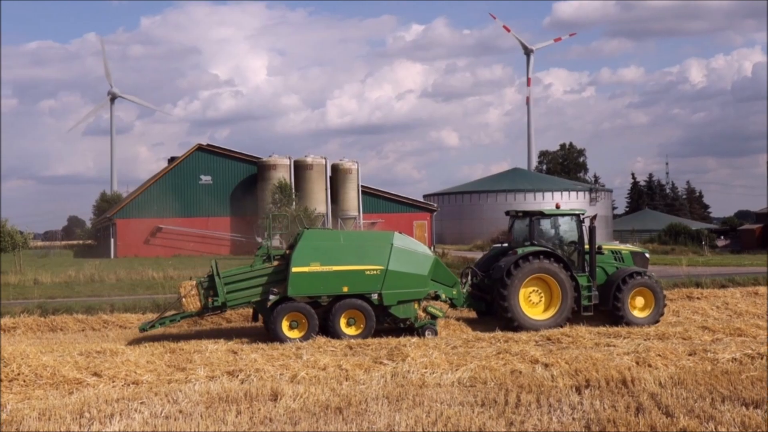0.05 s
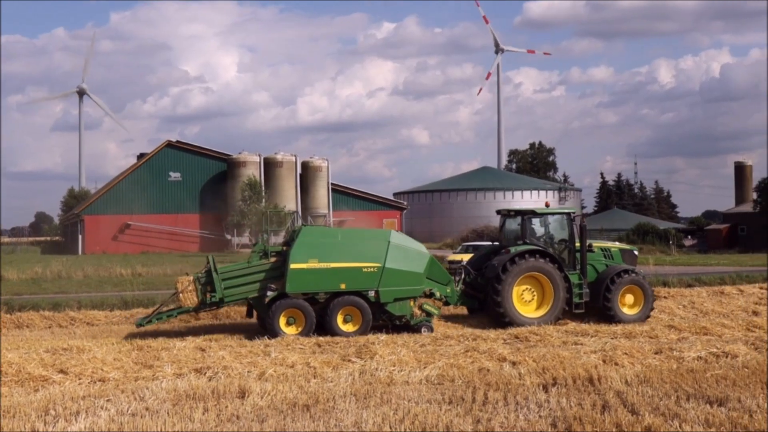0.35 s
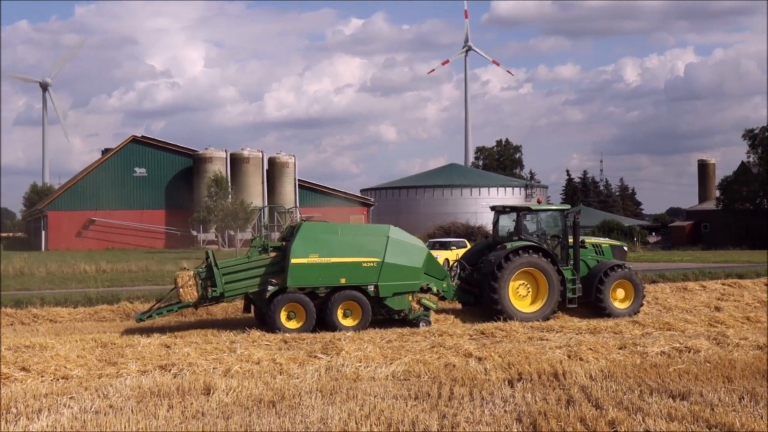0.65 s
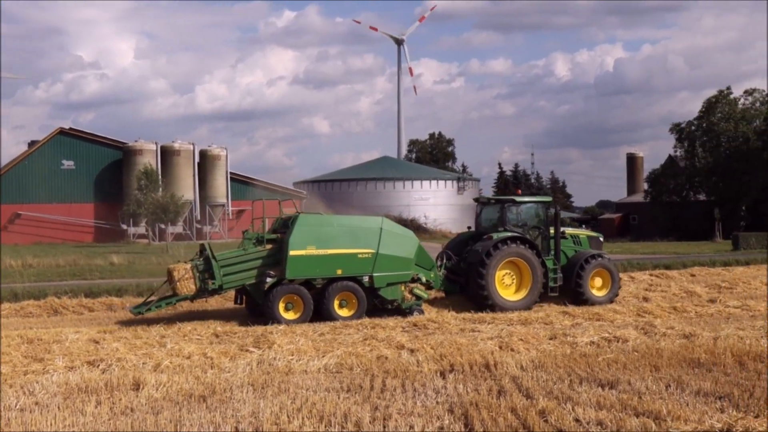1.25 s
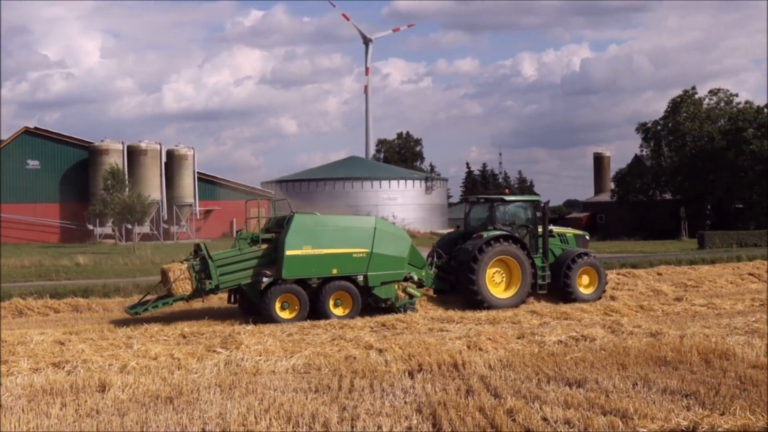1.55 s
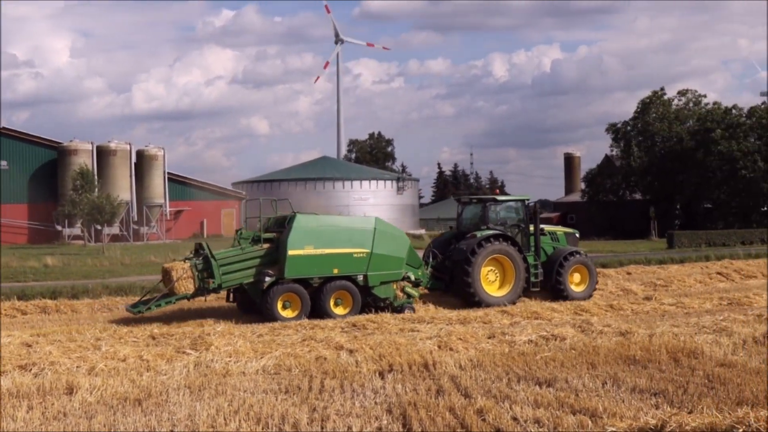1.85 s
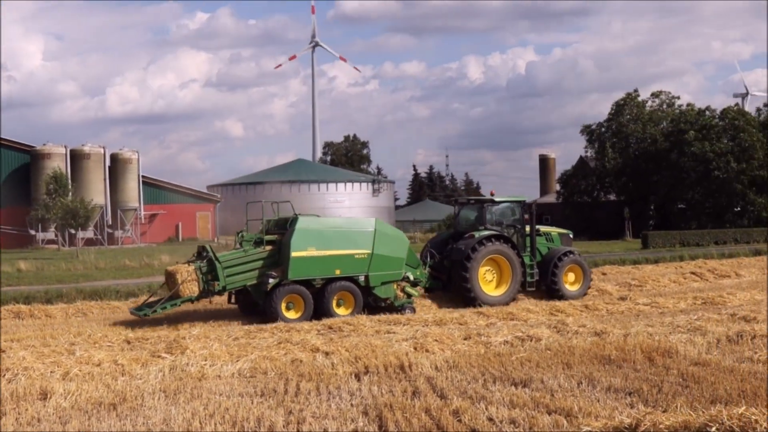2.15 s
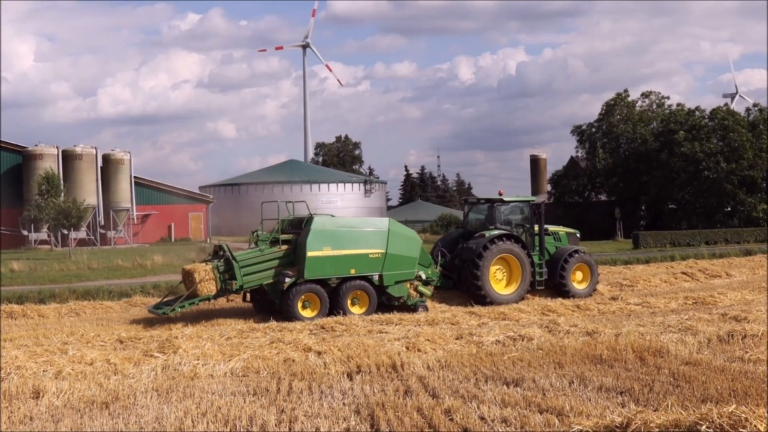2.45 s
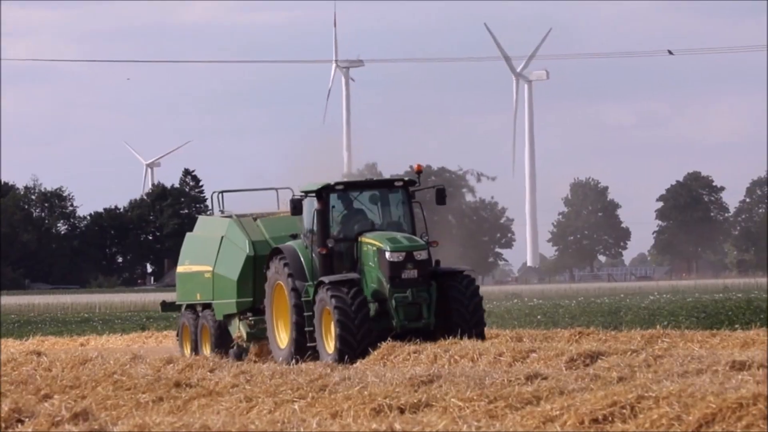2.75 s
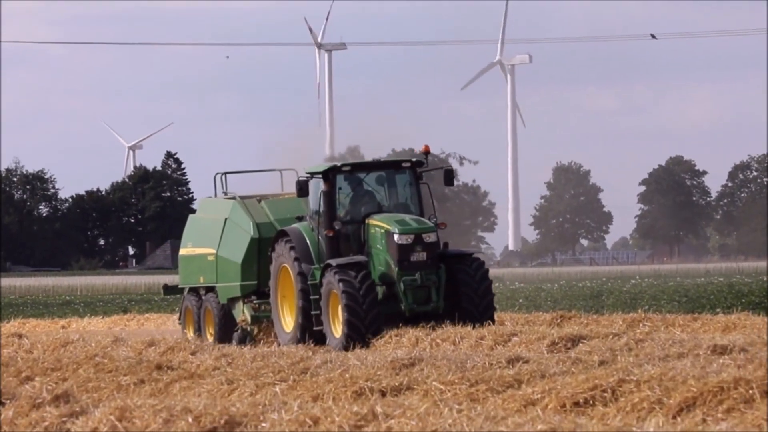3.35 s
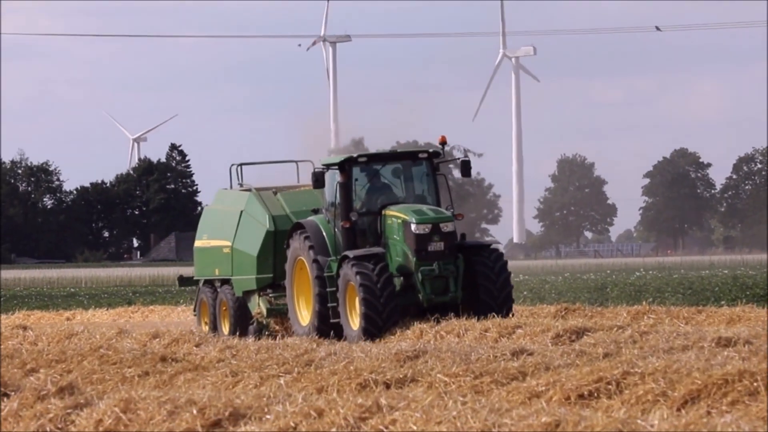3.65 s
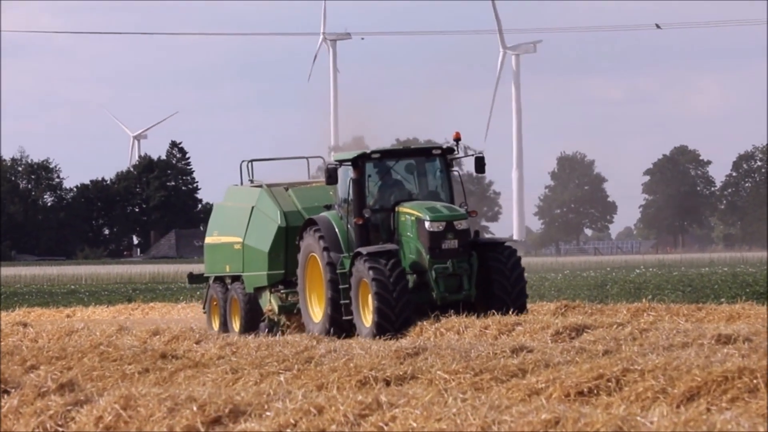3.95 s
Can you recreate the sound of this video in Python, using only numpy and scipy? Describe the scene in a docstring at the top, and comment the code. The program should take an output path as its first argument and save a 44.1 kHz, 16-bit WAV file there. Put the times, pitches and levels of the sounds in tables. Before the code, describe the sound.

A diesel tractor and baler run loudly from the start, with a fan hum and rushing, rattling straw. Irregular crunches, dull knocks and metal ticks come throughout, with short squeaks around 1.4 seconds and a clank near 1.9. At 2.4 seconds everything cuts to silence. From 2.7 to 4 seconds the tractor returns quieter and farther off, with a low throb, light clatter, faint whine and wind on the microphone.

```python
"""A diesel drone, a fan hum and rushing straw, with crunches, knocks, clanks, squeaks and sharp ticks:
a tractor pulls a big square baler across a stubble field, heard side-on. Straw rattles through the
pickup, the plunger crushes each charge, loose guards chatter and wind buffets the microphone.
After a short silence the rig is heard from the front, farther off: soft exhaust throb, injector
clatter and a gear whine."""
import sys
import numpy as np
from scipy import signal
from scipy.fft import rfft, irfft
from scipy.io import wavfile

SR = 44100
rng = np.random.default_rng(int(sys.argv[2]) if len(sys.argv) > 2 else 0)


def unload_audio(sound):
    """Save the sound as a 16-bit wav file, at the path given as the first command line argument."""
    columns = np.transpose(np.atleast_2d(sound))
    # keep every value between -1 and 1, then stretch to whole-number steps
    steps = np.round(np.clip(columns, -1, 1) * 32767)
    wavfile.write(sys.argv[1], SR, steps.astype(np.int16))


N = 176400
T = np.arange(N) / SR
FIRINGS_PER_TURN = 3  # six cylinders


def from_db(db):
    return 10 ** (np.asarray(db) / 20)


def unit_rms(x):
    return x / np.sqrt(np.mean(x ** 2) + 1e-20)


def in_time(rows):
    """Table columns, interpolated linearly in time."""
    times, *columns = np.transpose(rows)
    return np.squeeze([np.interp(T, times, column) for column in columns])


def drift(rate_hz):
    """Slow random wander, rms about 1."""
    pole = np.exp(-80 * np.pi * rate_hz / SR)
    slow = signal.lfilter([1], [1, -2 * pole, pole * pole], rng.standard_normal(N // 40 + 2002))[2000:]
    return np.interp(np.arange(N) / 40, np.arange(len(slow)), unit_rms(slow))


def coloured(x, spectrum):
    """Filter by (frequency [Hz], gain [dB]) rows, steep skirts beyond the ends; rms 1."""
    hz, db = np.transpose(spectrum)
    bins_hz = np.maximum(np.arange(N // 2 + 1) * SR / N, 1)
    gain = from_db(np.interp(np.log(bins_hz), np.log(hz), db))
    skirts = np.minimum(1, np.minimum(bins_hz / hz[0], hz[-1] / bins_hz)) ** 4
    return unit_rms(irfft(rfft(x) * gain * skirts, N))


def noise(width_db):
    """Stereo white noise; width is side over mid."""
    mid, side = rng.standard_normal((2, N))
    return mid + from_db(width_db) * side * np.array([[1], [-1]])


def grains(per_s, spread_db):
    """Randomly timed snaps; rms 1."""
    sizes = from_db(spread_db * np.minimum(rng.exponential(1, N), 4)) * rng.choice([-1, 1], N)
    return unit_rms(sizes * (rng.random(N) < per_s / SR))


def phase_of(hz):
    return 2 * np.pi * np.cumsum(hz) / SR


def burst(start_s, hold_s, attack_s, decay_s):
    """Linear attack, hold, exponential release."""
    attack = np.clip((T - start_s) / attack_s, 0, 1)
    return attack * np.exp(-np.maximum(T - start_s - hold_s, 0) / decay_s)


def rattle(per_s, low_hz, high_hz, ring_s, count):
    """Small parts struck at random, each ringing briefly at its own pitch."""
    rings, pole = 0, np.exp(-1 / (ring_s * SR))
    for hz in np.linspace(low_hz, high_hz, count) * rng.uniform(.98, 1.02, count):
        omega = 2 * np.pi * hz / SR
        chance = rng.random(N) * SR / per_s
        taps = np.where(chance < 1, chance - .5, 1e-18)
        rings += signal.lfilter([np.sin(omega)], [1, -2 * pole * np.cos(omega), pole * pole], taps)
    return unit_rms(rings)


def diesel(firing_phase):
    """Low exhaust orders, each slightly unsteady in level and phase."""
    # exhaust orders: (multiple of firing rate, relative level [dB])
    orders = [(1, -2.5), (1.5, -10.5), (2, -16.5)]
    # drone: (time [s], level [dB])
    level = [(0, -25), (.3, -25.5), (.45, -30), (.8, -27.5), (1.3, -34), (1.65, -27), (2, -32), (2.42, -32),
             (2.66, -43), (3.15, -43), (3.27, -37), (3.5, -37), (3.66, -50), (3.76, -35), (3.86, -41),
             (4, -42)]
    exhaust = 0
    for order, db in orders:
        gain = from_db(db + 1.8 * drift(2.6))
        exhaust += gain * np.sin(order * firing_phase + .2 * drift(5.1) + rng.uniform(0, 2 * np.pi))
    return from_db(in_time(level)) * unit_rms(exhaust)


def housing_rumble():
    """The running baler's housing rumbles, side-on."""
    # housing spectrum: (frequency [Hz], gain [dB])
    colour = [(55, -8.5), (80, -6.5), (130, -1.5), (175, -4), (250, -3), (330, -5.5), (420, -10.5),
              (500, -16), (700, -17.5), (910, -23)]
    # rumble: (time [s], relative level [dB])
    level = [(0, -22.5), (.6, -24), (.9, -23), (1.3, -25), (1.7, -23.5), (2.1, -23.5), (2.42, -26)]
    return coloured(noise(width_db=-73), colour) * from_db(in_time(level) + 3.5 + drift(16))


def pickup(firing_phase):
    """Straw and tines rattle in the pickup, shaken at the crank rate."""
    # straw spectrum: (frequency [Hz], gain [dB])
    colour = [(290, -15), (500, -8), (657, -5.5), (850, 1), (1290, 2.5), (2000, -4), (2770, -6.5),
              (3200, -10), (3500, -9.5), (4400, -13.5), (5250, -14.5), (5800, -22), (6200, -26),
              (7100, -19), (7950, -16), (8700, -23.5), (9540, -20.5), (11700, -28.5), (13200, -27),
              (13800, -22.5), (14150, -25.5), (14600, -37), (15600, -35)]
    # straw rush: (time [s], relative level [dB])
    level = [(0, -21.7), (.2, -23), (.35, -22.5), (.55, -24.3), (.75, -23.5), (1, -23), (1.25, -23.3),
             (1.5, -22), (1.7, -23.3), (2, -22.5), (2.2, -23), (2.42, -23.5)]
    tines = rattle(per_s=30, low_hz=1396.5, high_hz=14330, ring_s=.0083, count=80)
    straw = noise(width_db=-64.5) + .57 * grains(per_s=2500, spread_db=2.5)
    shake_db = np.sin(firing_phase / FIRINGS_PER_TURN) + .5 * drift(17)
    return coloured(straw + .5 * tines, colour) * from_db(in_time(level) + .5 + shake_db)


def crunches(firing_phase):
    """Plunger and feeder forks crush each charge of straw in a dense burst of snaps."""
    # crunches: (start [s], length [s], level [dB])
    charges = [(.413, .042, -22), (.92, .075, -30), (1.138, .04, -24.5), (1.325, .065, -25),
               (1.41, .09, -28), (1.838, .068, -20.8), (1.96, .08, -27.5), (2.275, .02, -29)]
    # crushed straw spectrum: (frequency [Hz], gain [dB])
    colour = [(100, -25.5), (300, -16), (600, 3.5), (950, 1.5), (1800, 1), (3400, -4), (5200, -13),
              (6200, -21), (8000, -20), (15000, -58.5)]
    force = sum(from_db(db) * burst(start_s, length_s, attack_s=.0024, decay_s=.016)
                for start_s, length_s, db in charges)
    shake_db = .75 * np.sin(firing_phase / FIRINGS_PER_TURN)
    straw = noise(width_db=-62) + .88 * grains(per_s=2100, spread_db=0)
    return force * from_db(shake_db) * coloured(straw, colour)


def spinning_tone(track, wander_hz, wander_rate_hz, flutter_db):
    """Note of a spinning part, fluttering on its way through the air."""
    hz, db = in_time(track)
    flutter = from_db(flutter_db * drift(3.7))
    phase = phase_of(hz + wander_hz * drift(wander_rate_hz))
    return from_db(db) * unit_rms(flutter * np.sin(phase))


def fan():
    """Hum of the spinning fan."""
    # hum: (time [s], frequency [Hz], level [dB])
    hum = [(0, 282, -21.5), (.14, 282, -21.5), (.22, 282, -28), (.37, 282.5, -30), (.44, 283.5, -19),
           (.53, 286, -24), (.93, 286, -22.5), (1.28, 287, -24), (1.35, 286, -35), (1.46, 284, -20),
           (1.62, 283, -33), (1.72, 284, -27.5), (1.9, 286, -32), (2.03, 286, -26.5), (2.42, 285, -34)]
    return spinning_tone(hum, wander_hz=1.1, wander_rate_hz=8, flutter_db=1.8)


def knocks():
    """Dull knocks of the hollow baler housing."""
    # knocks: (start [s], level [dB])
    hits = [(0.219, -16), (0.438, -17.5), (.925, -16), (1.458, -16.5), (1.851, -15.5), (1.993, -11)]
    # housing resonance: (frequency [Hz], gain [dB])
    colour = [(110, -3.5), (200, 7), (280, 10), (360, 5), (480, -23)]
    force = sum(from_db(db) * burst(start_s, hold_s=.00313, attack_s=.0053, decay_s=.0087)
                for start_s, db in hits)
    return force * coloured(noise(width_db=-56), colour)


def ram_clank():
    """The ram hits its stop and bounces three times, each touch a short metallic ring."""
    # ram modes: (frequency [Hz], relative level [dB])
    modes = [(921, 0), (1030, -10), (1507, -8)]
    hit_s, hit_db, bounce_s, loss_db = 1.855, -17.5, .0192, 1.8
    force = sum(from_db(hit_db - k * loss_db)
                * burst(hit_s + k * bounce_s, hold_s=.005, attack_s=.002, decay_s=.005) for k in range(4))
    ring = sum(from_db(db) * np.sin(phase_of(hz + 15 * drift(53))) for hz, db in modes)
    return force * unit_rms(ring)


def guard_clatter():
    """Loose steel guards chatter in short bursts, each around its own pitch."""
    # clatters: (start [s], length [s], level [dB], centre [Hz])
    bursts = [(.418, .034, -21, 2150), (1.14, .026, -26.5, 2450), (1.345, .028, -25, 2100),
              (1.767, .007, -23, 1900), (2.281, .016, -20.5, 1750), (3.11, .007, -36, 1600)]
    # guard spectrum: (multiple of centre, gain [dB])
    colour = [(.45, -7), (.8, -1), (1.1, 0), (1.35, -4), (1.8, -11)]
    contacts = grains(per_s=3700, spread_db=-2)
    clatter = 0
    for start_s, length_s, db, centre_hz in bursts:
        guard = coloured(contacts, [(ratio * centre_hz, gain_db) for ratio, gain_db in colour])
        clatter += from_db(db) * burst(start_s, length_s, attack_s=.002, decay_s=.002) * guard
    return clatter


def ticks():
    """Sharp ticks of the baler's moving metal parts."""
    # ticks: (start [s], level [dB])
    hits = [(0.682, -21.5), (.722, -29.5), (1.956, -21.5)]
    # metal spectrum: (frequency [Hz], gain [dB])
    colour = [(500, 0.5), (2500, 3), (3400, 10), (5000, 4.5), (6200, 1), (7800, 8), (10000, 0.5),
              (14000, 1), (16000, -17)]
    force = sum(from_db(db) * burst(start_s, hold_s=.003, attack_s=.00067, decay_s=.005)
                for start_s, db in hits)
    return force * coloured(noise(width_db=-59), colour)


def squeaks():
    """Rubbing parts squeak, sagging in pitch as they slow."""
    # squeaks: (start [s], length [s], level [dB])
    rubs = [(1.325, .055, -25), (1.457, .035, -28)]
    start_hz, sag_hz_per_s = 1760, 7800
    waver_hz = 30 * drift(91.4)
    sound = 0
    for start_s, length_s, db in rubs:
        hz = start_hz + waver_hz - sag_hz_per_s * np.clip(T - start_s, 0, length_s)
        envelope = from_db(db) * burst(start_s, length_s, attack_s=.006, decay_s=.006)
        sound += envelope * np.sin(phase_of(hz))
    return sound


def exhaust_rumble():
    """Dull exhaust noise, from the front."""
    # exhaust spectrum: (frequency [Hz], gain [dB])
    colour = [(32, -41), (55, -3), (96, -6), (210, -10.5), (259, -17), (283, -21.5), (307, -21.5),
              (600, -24.5), (780, -44), (1320, -120)]
    # rumble: (time [s], relative level [dB])
    level = [(2.68, -37.5), (3.628, -39), (3.98, -38.5), (4.0, -36)]
    return coloured(noise(width_db=-4), colour) * from_db(in_time(level) + 3)


def injectors(firing_phase):
    """Injector clatter, swelling with each firing."""
    # clatter spectrum: (frequency [Hz], gain [dB])
    colour = [(260, -32), (450, -18), (562, -10.5), (973, -6.5), (1230, -3), (1330, -6), (1590, -6),
              (2000, -10), (2440, -15), (3330, -13), (3920, -13.5), (4600, -21), (5430, -24.5), (8500, -29),
              (11500, -38), (15600, -41)]
    # clatter: (time [s], relative level [dB])
    level = [(2.68, -41.5), (2.83, -42.5), (3.04, -44), (3.11, -41.5), (3.17, -43.5), (3.5, -42),
             (3.76, -45.5), (3.8, -40), (3.9, -43), (4, -44)]
    parts = rattle(per_s=14, low_hz=744, high_hz=4503, ring_s=.015, count=40)
    clatter = noise(width_db=-12.5) + .17 * grains(per_s=1300, spread_db=-1) + .26 * parts
    beat_db = .65 * np.sin(firing_phase) + .49 * np.sin(firing_phase / 2) + .51 * drift(30)
    return coloured(clatter, colour) * from_db(in_time(level) + 4 + beat_db)


def gears():
    """Whine of the spinning gears."""
    # whine: (time [s], frequency [Hz], level [dB])
    whine = [(0, 1226, -41), (.5, 1234, -39), (.8, 1224, -36), (1.15, 1235, -36), (1.45, 1228, -45),
             (2.42, 1240, -42), (2.66, 1232, -50), (3.2, 1222, -51), (3.6, 1205, -52), (4, 1225, -55)]
    return spinning_tone(whine, wander_hz=4.9, wander_rate_hz=34.3, flutter_db=2)


def squeal(pitch_hz=13110):
    """Thin squeal of the baler's moving parts."""
    # squeal: (time [s], level [dB])
    level = [(0, -68), (.15, -54.5), (.32, -47), (.42, -46), (.6, -66), (.8, -82)]
    return from_db(in_time(level)) * np.sin(phase_of(pitch_hz + 45 * drift(120)))


def rustle():
    """Straw rustles under the approaching rig."""
    # rustle: (time [s], level [dB])
    level = [(2.66, -48), (2.9, -46), (3.15, -41), (3.3, -45), (3.5, -57), (3.7, -48.5), (4, -59)]
    # straw spectrum: (frequency [Hz], gain [dB])
    colour = [(2300, -3.5), (3100, -4), (3600, 1.5), (4100, -4), (5200, -14), (6200, -18), (8000, -26)]
    straw = noise(width_db=-6) + grains(per_s=980, spread_db=0)
    return coloured(straw, colour) * from_db(in_time(level))


def wind():
    """Low gusts on the microphone."""
    # gusts: (time [s], level [dB])
    level = [(0, -41), (.25, -36), (.6, -36), (.72, -30), (.85, -35), (1.2, -34), (1.32, -42), (1.52, -33),
             (1.68, -36), (1.76, -22), (1.87, -34), (2.02, -29), (2.42, -31), (2.66, -48), (2.92, -45),
             (3.02, -34), (3.15, -47)]
    # gust spectrum: (frequency [Hz], gain [dB])
    colour = [(10, -3.5), (20, -8), (30, 7.5), (48, -9), (80, -2), (200, -49.5), (500, -70.5)]
    return from_db(in_time(level)) * coloured(noise(width_db=-47.5), colour)


def eddies():
    """Eddies buffet left and right differently."""
    # buffeting: (time [s], level [dB])
    level = [(2.66, -42), (2.88, -34), (3.13, -29), (3.22, -34), (3.33, -25), (3.43, -36), (3.7, -44),
             (4, -34)]
    # eddy spectrum: (frequency [Hz], gain [dB])
    colour = [(12, -7), (35, -3), (70, -6), (150, -22), (400, -42)]
    return from_db(in_time(level)) * coloured(noise(width_db=7.5), colour)


def field_hiss(level_db=-56.5):
    """Fine hiss of straw all over the field."""
    # hiss spectrum: (frequency [Hz], gain [dB])
    colour = [(6000, 2), (10000, -2), (15600, -4.5)]
    return from_db(level_db) * coloured(noise(width_db=0), colour)


def scene():
    """The rig side-on, a short silence, then the rig from the front."""
    # diesel firing: (time [s], rate [Hz])
    firing_rate = [(0, 89), (.25, 90.96), (.75, 90.8), (1.2, 92.3), (1.65, 89.56), (2.4, 93.3), (2.7, 90.6),
                   (3.2, 93), (3.45, 89), (4, 93.8)]
    side_end_s, fade_s, front_start_s = 2.423, .001, 2.659
    right_delay_s, pan_db = .00004, .5
    firing_phase = phase_of(in_time(firing_rate))
    running = diesel(firing_phase) + gears() + wind() + guard_clatter()
    side = running + fan() + housing_rumble() + pickup(firing_phase) + crunches(firing_phase)
    side += knocks() + ram_clank() + squeaks() + ticks() + squeal()
    left, right = running + exhaust_rumble() + injectors(firing_phase) + rustle()
    front = np.array([left, np.interp(T - right_delay_s, T, right)]) + field_hiss() + eddies()
    front *= from_db([[pan_db], [-pan_db]])
    side_fade = np.exp(-np.maximum(T - side_end_s, 0) / fade_s)
    return side * side_fade + front * (T >= front_start_s)


def record(dry):
    """Steep low-pass."""
    cutoff_hz = 15800
    return signal.sosfilt(signal.ellip(12, .1, 80, cutoff_hz, fs=SR, output="sos"), dry)


dry = scene()
out = record(dry)
unload_audio(out)
```